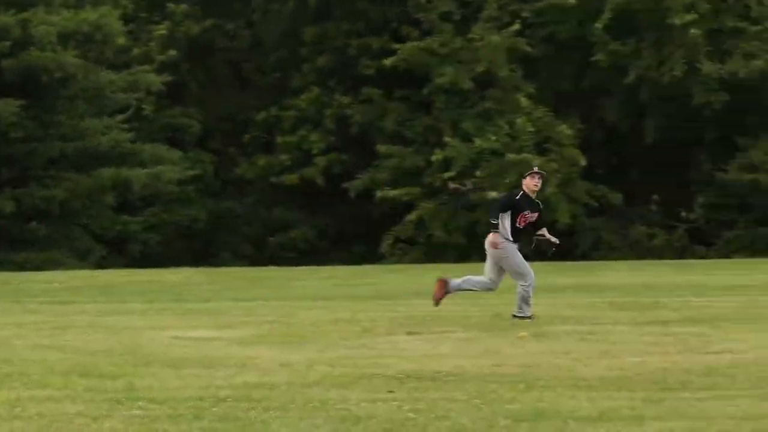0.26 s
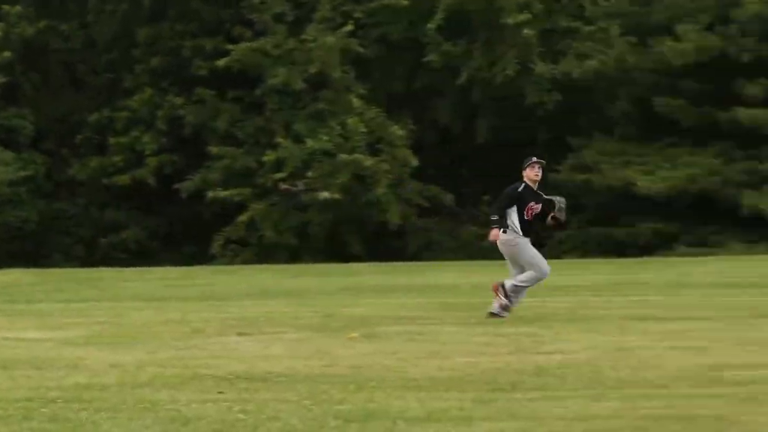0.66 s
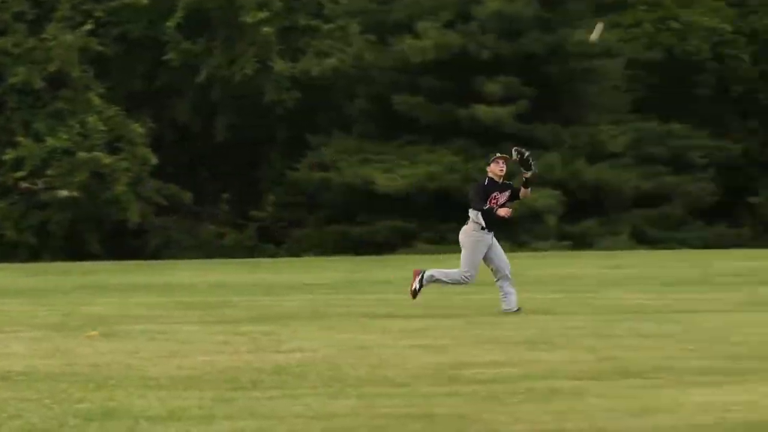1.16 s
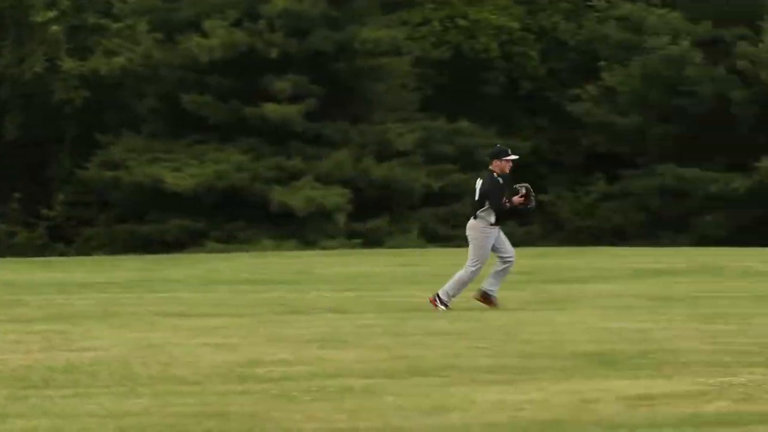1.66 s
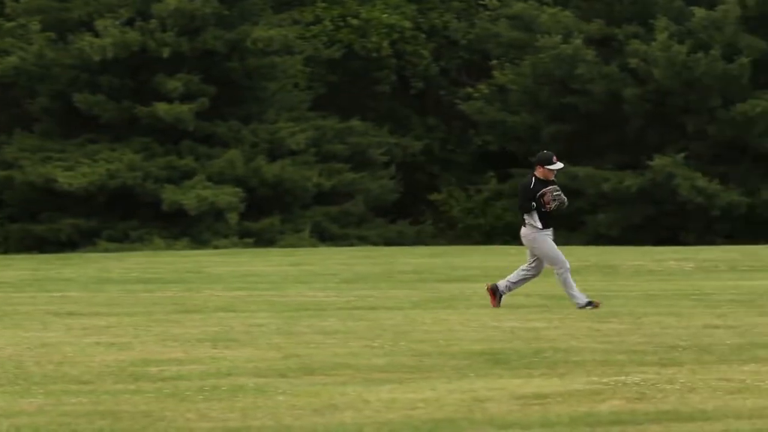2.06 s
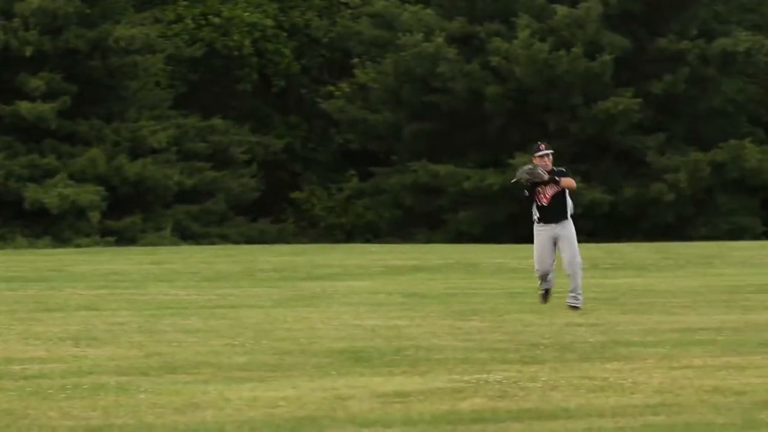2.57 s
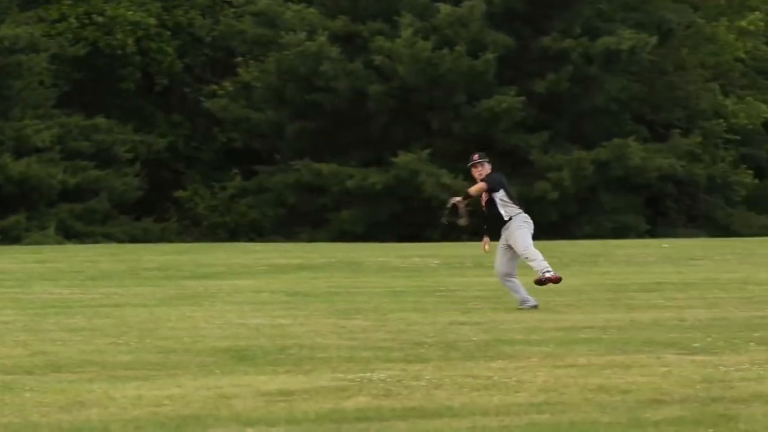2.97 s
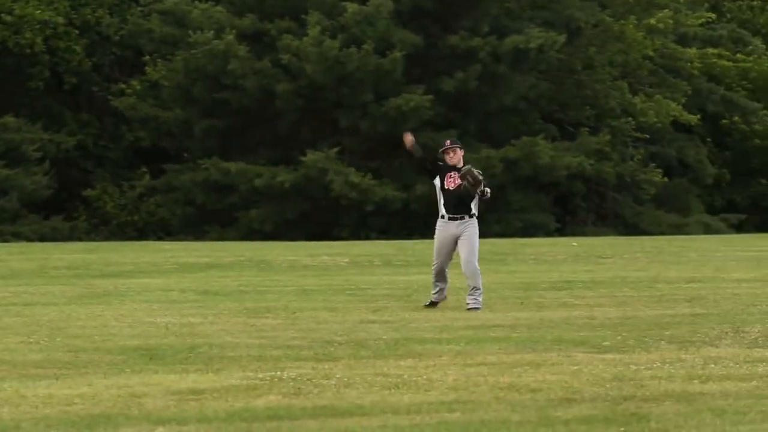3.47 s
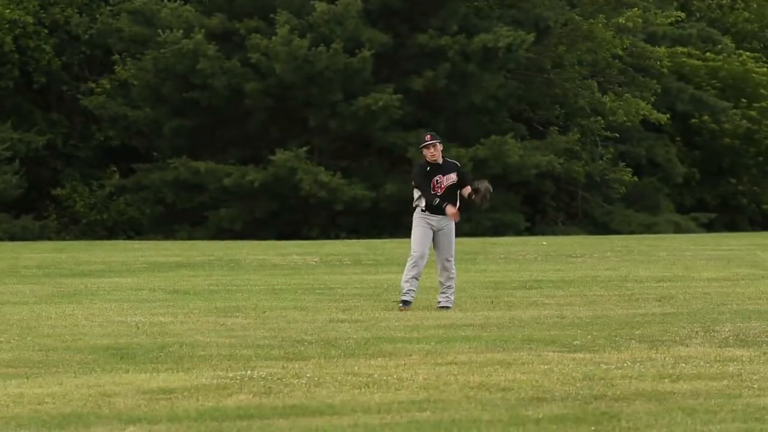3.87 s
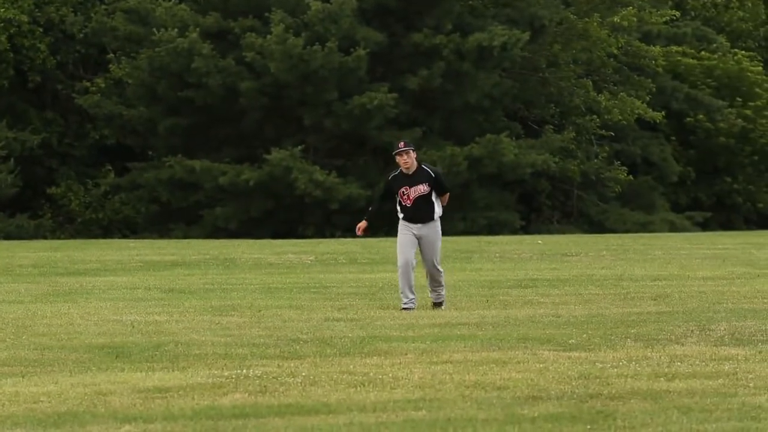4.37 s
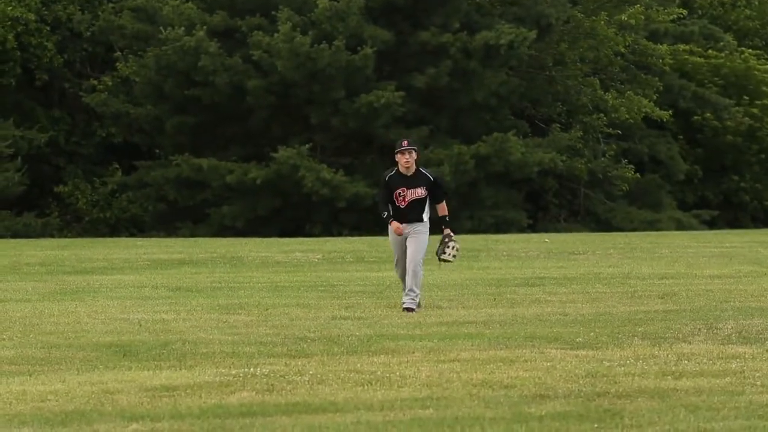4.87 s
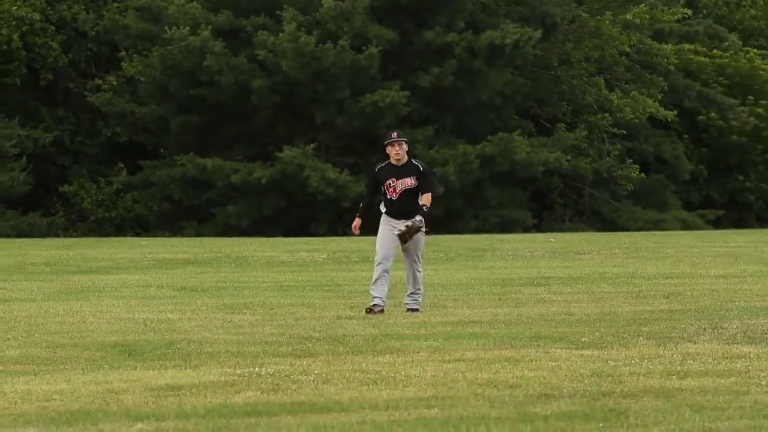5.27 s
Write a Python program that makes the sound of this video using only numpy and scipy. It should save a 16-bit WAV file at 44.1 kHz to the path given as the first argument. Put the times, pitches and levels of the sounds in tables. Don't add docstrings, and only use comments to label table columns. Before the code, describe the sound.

Quiet open-air hush with a distant humming truck, faint birds and a cricket; one far glove pop, later one near, sharp leather crack.

```python
import sys
import numpy as np
from scipy import signal
from scipy.fft import rfft, irfft
from scipy.io import wavfile
from scipy.ndimage import uniform_filter1d

SR = 44100
rng = np.random.default_rng(int(sys.argv[2]) if len(sys.argv) > 2 else 0)


def amplitude_ratio(level_db):
    exponent = np.asarray(level_db, float) / 20
    return 10 ** exponent


def unload_audio(sound):
    columns = np.transpose(np.atleast_2d(sound))
    steps = np.round(np.clip(columns, -1, 1) * 32767)
    wavfile.write(sys.argv[1], SR, steps.astype(np.int16))


N = 242991
T = np.arange(N) / SR

# (frequency [Hz], density [dB per Hz])
FIELD_SPECTRUM = [(20, -31), (45, -16.5), (75, -1), (130, -2), (215, -6), (265, -14), (400, -20.5),
                  (620, -17), (1260, -16), (2500, -27.5), (3900, -30), (4500, -35), (6000, -38.5),
                  (15650, -38.5)]
# (time [s], level [dB])
BREEZE = [(0, 0), (.43, 2), (.89, -1.5), (1.4, 0.6), (2.07, -0.6), (5.51, 0)]

# (time [s], firing rate [Hz], level [dB])
TRUCK = [
    (0, 172.6, -49),
    (.7, 181.9, -45),
    (1.3, 189.8, -40),
    (2.2, 200.5, -39),
    (3.1, 211.9, -42),
    (4.27, 230.5, -48.5),
    (4.4, 207.1, -44),
    (4.7, 151.8, -55),
    (4.85, 149.1, -48.5),
    (5.51, 148.9, -48),
]
# (time [s], depth [dB])
AIR_FADES = [(.30, -6), (.51, -13), (1.13, -6), (1.46, -2.5), (1.9, -4.5), (2.46, -5.5), (4.26, -5.5),
             (4.58, -7)]
# (time [s], firing rate [Hz], level [dB])
CAR = [(2.4, 76.1, -54.5), (3.4, 82.54, -51), (4.6, 84.63, -50.5), (5.51, 96.2, -56.5)]
BUS = [(4.6, 219, -64), (4.9, 221, -57), (5.51, 220, -56)]
VAN = dict(start_hz=101.9, top_hz=155.3, gather_s=3.3, near_s=2.0, near_db=-50.5, away_db_per_s2=-1.5, end_s=4.5)
# (multiple of firing rate [ratio], level [dB])
TRUCK_LINES = [(1, -0.5)]
CAR_LINES = [(1, 0), (2, -6.5)]
VAN_LINES = [(0.98, 0)]
VAN_OVERTONES = [(2, 0.5), (2.45, -3)]

# (time [s], length [s], start pitch [Hz], end pitch [Hz], level [dB])
OPEN_BIRDS = [(.34, .014, 7800, 7200, -69), (1.33, .09, 4150, 4140, -67), (1.56, .055, 4380, 4350, -69),
              (2.46, .025, 2050, 2050, -60), (2.98, .08, 2900, 2700, -61), (3.045, .068, 2950, 2580, -56),
              (4.28, .12, 2700, 2680, -73), (4.54, .1, 2600, 2720, -64.5), (4.6, .068, 3950, 3950, -62),
              (5.1, .025, 2950, 2950, -65)]
# (time [s], length [s], start [Hz], end [Hz], level [dB])
TREE_BIRDS = [(4.163, .062, 4730, 4710, -62), (4.595, .09, 3780, 3780, -62)]
CRICKET = dict(first=.036, period=.1222, length=.021, start_hz=4800, end_hz=4430, db=-64.5, tire_db=-2.3, phrase=4, count=8)
TRILL = dict(first=4.365, period=.043, length=.016, start_hz=3200, end_hz=3040, db=-69, accent_db=6, accent=2, count=4)

# (time [s], peak level [dB], centre [Hz], knock level [dB])
SCUFFS = [(.4529, -55, 2750, -54), (1.0305, -51, 3600, -50), (1.286, -53, 3660, -60),
          (1.36, -53, 2900, -62), (2.297, -53, 3430, -61)]
# (time [s], [(frequency [Hz], level [dB], T60 [s])])
KNOCKS = [
    (.23505, [(1900, -32, .0025), (3600, -41, .002)]),
    (1.0305, [(260, -39, .05), (1350, -40, .04), (3500, -49, .018), (4200, -49, .015), (6000, -49, .004)]),
]
# (time [s], length [s], centre [Hz], level [dB])
RUSTLES = [(.25, .4, 2800, -66), (1.18, .06, 3900, -62), (1.25, .06, 3800, -62), (1.31, .16, 3600, -61),
           (1.48, .18, 3500, -63), (2.25, .08, 3500, -67), (2.62, .1, 3800, -70), (4.87, .05, 4000, -68),
           (5.05, .25, 3600, -67)]

# (time [s], blow on pocket [dB], blow on laces [dB])
FAR_CONTACTS = [(1.46885, -50.3, -32.8), (1.47021, -31.1, -28.9), (1.47227, -23, -19.3),
                (1.47323, -27.7, -18.1), (1.47444, -25.1, -31.6), (1.47667, -28.4, -31.0)]
# (frequency [Hz], level [dB], T60 [s])
FAR_POCKET = [(319, -0.0, 0.0191), (1075, -8.0, 0.0204), (1200, 5.8, 0.0255), (1732, -6.3, 0.0255)]
FAR_LACES = [(2511, -20.0, 0.0204), (3409, -5.3, 0.0142), (3597, -0.2, 0.0255), (4431, -22.6, 0.0136),
             (6490, -9.9, 0.0026)]
# (time [s], frequency [Hz], level [dB], T60 [s])
FAR_PANELS = [(1.4755, 1630, -22, .014), (1.4728, 2500, -28, .014), (1.4722, 2950, -26, .014),
              (1.4712, 270, -29, .04), (1.4711, 1000, -28.5, .05), (1.4733, 1320, -28, .03)]
# (time [s], centre [Hz], width [Hz], level [dB], T60 [s])
FAR_SEAM = (1.4714, 8500, 9000, -34, .018)

# (time [s], blow [dB], sign [+-1])
NEAR_CONTACTS = [
    (5.38373, -9.3, -1),
    (5.38407, -21.9, -1),
    (5.3846, -18, 1),
]
# (frequency [Hz], level [dB], T60 [s])
NEAR_LEATHER = [(1137, .8, .0074), (2322, -6.5, .0073), (3668, -2, .0059), (4663, -6.8, .0036),
                (7095, 1.9, .0015), (8765, -2.8, .0022)]
# (time [s], start pitch [Hz], glide [s], level [dB], T60 [s])
NEAR_POCKET = (5.38446, 643, .00408, -10.5, .030)
# (time [s], [(frequency [Hz], level [dB], T60 [s])])
NEAR_SEAM = (5.38372, [(9300, -33, .003), (11600, -35, .002), (14200, -39, .003)])


def band(x, hz, width_hz):
    return signal.lfilter(*signal.iirpeak(min(hz, .45 * SR), hz / width_hz, fs=SR), x)


def walk(rate_hz):
    hold = int(SR / rate_hz)
    steps = np.repeat(rng.standard_normal(N // hold + 1), hold)
    slewed = uniform_filter1d(uniform_filter1d(steps, hold), hold)
    return 1.16 * slewed[:N]


def add(out, s, sound):
    i = int(s * SR)
    out[i:i + len(sound)] += sound[:N - i]


def decay(db, t, t60):
    return amplitude_ratio(db - 60 * t / t60)


def time_since(s, count):
    return np.maximum(np.arange(count) / SR - s * SR % 1 / SR, 0)


def ring(modes, s):
    t = time_since(s, 3000)
    return sum(decay(db, t, t60) * np.sin(2 * np.pi * hz * t) for hz, db, t60 in modes)


def crackle(count, hz, width_hz, db, t60):
    noise = band(rng.standard_normal(count), hz, width_hz)
    return noise * decay(db, np.arange(count) / SR, t60)


def field():
    breath = np.interp(T, *np.transpose(BREEZE))
    road_db, leaf_db = 0.52 * breath, 1.26 * breath
    hzs, dbs = np.transpose(FIELD_SPECTRUM)
    log_hz = np.log2(np.maximum(np.arange(N // 2 + 1) * SR / N, 1))
    colour = amplitude_ratio(np.interp(log_hz, np.log2(hzs), dbs, right=-70))
    spectrum = rfft(rng.standard_normal(N)) * colour
    out = np.zeros(N)
    for octave in np.arange(4, 14.6, .5):
        share = np.cos(np.pi * np.clip(log_hz - octave, -.5, .5)) ** 2
        road_swell = road_db * np.exp(-((octave - 9.7) / 1.1) ** 2)
        leaf_swell = leaf_db * np.exp(-((octave - 11.7) / 1.0) ** 2)
        flicker = 0.86 * walk(9) * np.clip((13.2 - octave) / 3, .1, 1)
        out += amplitude_ratio(road_swell + leaf_swell + flicker) * irfft(spectrum * share, N)
    return out * amplitude_ratio(-47) / np.std(out)


def engine(track, orders, wobble, flutter_db):
    s, hz, db = np.transpose(track)
    rate = np.interp(T, s, hz) * (1 + wobble * walk(20))
    phase = 2 * np.pi * np.cumsum(rate) / SR
    fade_in = T - s[0] + (s[0] < .1)
    fade_out = s[-1] - T + (s[-1] > 5.4)
    fade = np.clip(np.minimum(fade_in, fade_out) / .2, 0, 1)
    lines = sum(amplitude_ratio(d + flutter_db * walk(12)) * np.sin(k * phase + k) for k, d in orders)
    return np.sqrt(2) * fade * amplitude_ratio(np.interp(T, s, db)) * lines


def van_track(start_hz, top_hz, gather_s, near_s, near_db, away_db_per_s2, end_s):
    s = np.arange(0, end_s, 1 / 10)
    rate = top_hz - (top_hz - start_hz) * np.exp(-s / gather_s)
    level = near_db + away_db_per_s2 * (s - near_s) ** 2
    return np.transpose([s, rate, level])


def van():
    track, lift_s = van_track(**VAN), 2.34
    load = amplitude_ratio(-13 - 8.5 * np.clip((T - lift_s) / .3 + .5, 0, 1))
    return engine(track, VAN_LINES, 0.006, 1.4) + load * engine(track, VAN_OVERTONES, 0.0034, 2.5)


def truck():
    fade_s = 0.034
    fades = amplitude_ratio(sum(db * np.exp(-((T - s) / fade_s) ** 2) for s, db in AIR_FADES))
    return fades * engine(TRUCK, TRUCK_LINES, 0.0019, 1.16)


def traffic():
    car = engine(CAR, CAR_LINES, 0.012, 4.2)
    bus = engine(BUS, TRUCK_LINES, 0.0048, 1.5)
    return truck() + car + bus + van()


def whistle(length, start_hz, end_hz, db, t60):
    t = np.arange(int((length + .5) * SR)) / SR
    phase = 2 * np.pi * np.cumsum(np.interp(t, [0, length], [start_hz, end_hz])) / SR
    share = np.clip(t / length, 0, 1)
    roughness = 1 + 3 * band(rng.standard_normal(len(t)), 120, 200)
    body = np.abs(np.sin(np.pi * share)) ** .6 * roughness
    tail = decay(-6, np.maximum(t - length, 0), t60) * share ** 4
    flutter = 1 + 6 * band(rng.standard_normal(len(t)), 30, 40)
    return np.sqrt(2) * amplitude_ratio(db) * (body + tail * flutter) * np.sin(phase)


def series(first, period, length, start_hz, end_hz, db, count, accent_db=0, accent=0, tire_db=0, phrase=1):
    calls = []
    for k in range(count):
        level = db + accent_db * (k == accent) + tire_db * (k % phrase)
        calls.append((first + k * period, length, start_hz, end_hz, level))
    return calls


def wildlife():
    out = np.zeros(N)
    open_calls = OPEN_BIRDS + series(**TRILL) + series(**CRICKET)
    for calls, t60 in ((open_calls, .03), (TREE_BIRDS, .9)):
        for s, *call in calls:
            add(out, s, whistle(*call, t60))
    return out


def scuffs():
    out = np.zeros(N)
    for s, db, hz, knock_db in SCUFFS:
        add(out, s, band(crackle(SR // 20, hz, 2000, db + 8, .03), hz, 2000))
        add(out, s, band(crackle(SR // 20, 1450, 900, knock_db + 14, .04), 1450, 900))
    for s, modes in KNOCKS:
        add(out, s, -ring(modes, s))
    grain = rng.standard_normal(N) * amplitude_ratio(4 * walk(150))
    grain = band(band(grain, 3900, 1900), 3500, 1900)
    for s, length, hz, db in RUSTLES:
        i, n = int(s * SR), int(length * SR)
        add(out, s, amplitude_ratio(db + 14) * np.hanning(n) * band(grain[i:i + n], hz, 1300))
    return out


def blows(contacts, modes):
    out = np.zeros(N)
    for s, db, sign in contacts:
        add(out, s, sign * amplitude_ratio(db) * ring(modes, s))
    return out


def contact(x, push_ms, low_hz):
    ms = np.arange(-40, 41) / SR * 1000
    push = np.exp(-.5 * (ms / push_ms) ** 2)
    rounded = np.convolve(x, push / push.sum(), "same")
    return signal.sosfilt(signal.butter(2, low_hz, "hp", fs=SR, output="sos"), rounded)


def far_catch():
    grip_s = 1.479
    out = blows([(s, pocket_db, -1) for s, pocket_db, _ in FAR_CONTACTS], FAR_POCKET)
    out += blows([(s, laces_db, -1) for s, _, laces_db in FAR_CONTACTS], FAR_LACES)
    for s, *mode in FAR_PANELS:
        add(out, s, -ring([mode], s))
    out *= decay(0, np.maximum(T - grip_s, 0), .008)
    out = contact(out, .033, 200)
    out -= .6 * band(out, 640, 550)
    s, hz, width_hz, db, t60 = FAR_SEAM
    seam = crackle(SR // 10, hz, width_hz, db, t60)
    add(out, s, band(band(seam, hz, width_hz), hz, width_hz))
    tree_line = crackle(SR // 4, 3200, 2500, -56, 0.24)
    add(out, grip_s, tree_line)
    return out


def near_catch():
    out = blows(NEAR_CONTACTS, NEAR_LEATHER)
    s, start_hz, glide, db, t60 = NEAR_POCKET
    t = time_since(s, SR // 8)
    cycles = start_hz * glide * (1 - np.exp(-t / glide))
    add(out, s, decay(db, t, t60) * np.sin(2 * np.pi * cycles))
    settle = band(rng.standard_normal(len(t)), 220, 250)
    add(out, s, settle * decay(-27, t, 0.12) * np.clip(t / 0.024, 0, 1))
    out = contact(out, .033, 110)
    seam_s, stitches = NEAR_SEAM
    add(out, seam_s, -ring(stitches, seam_s))
    return out


def scene():
    background = field() + traffic() + wildlife() + scuffs()
    return (background + far_catch() + near_catch())[None]


def low_pass(x):
    return signal.sosfilt(signal.butter(12, 16860, fs=SR, output="sos"), x)


def record(dry):
    top_cut = signal.ellip(6, .1, 50, 16300, fs=SR, output="sos")
    mix = signal.sosfiltfilt(top_cut, dry)
    return low_pass(mix)


dry = scene()
out = record(dry)
unload_audio(out)
```